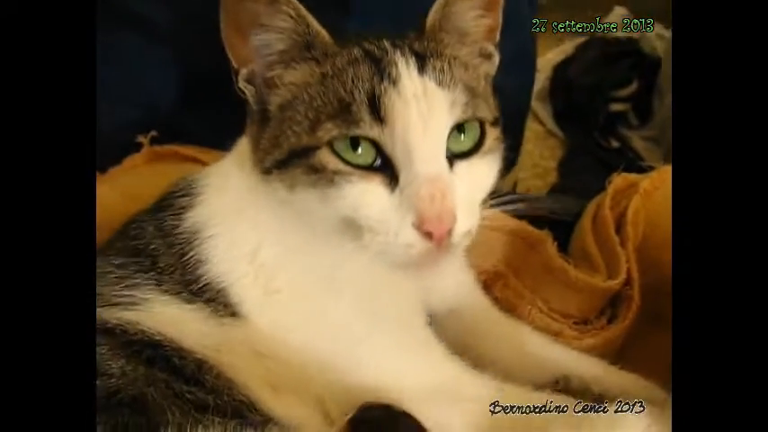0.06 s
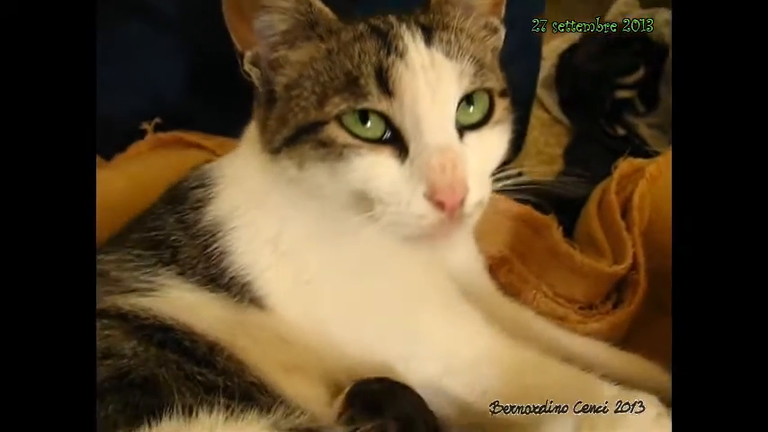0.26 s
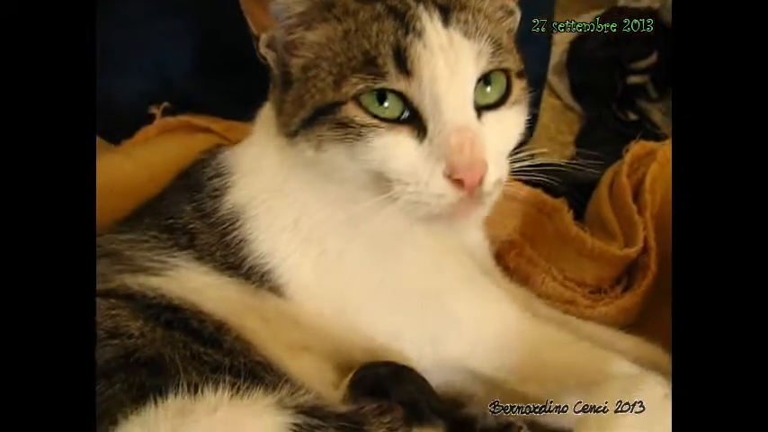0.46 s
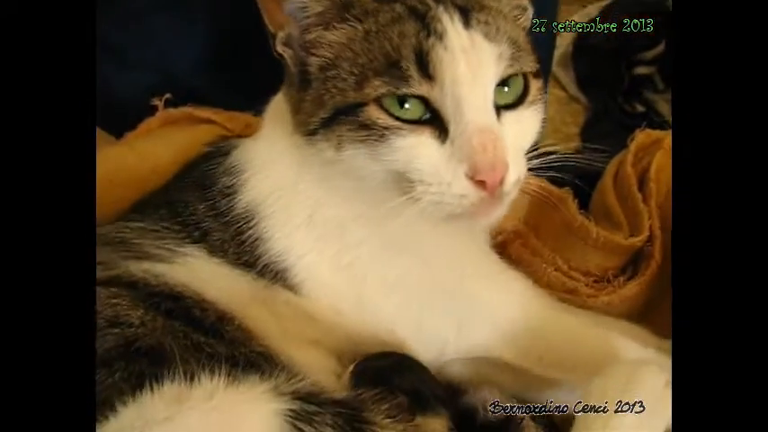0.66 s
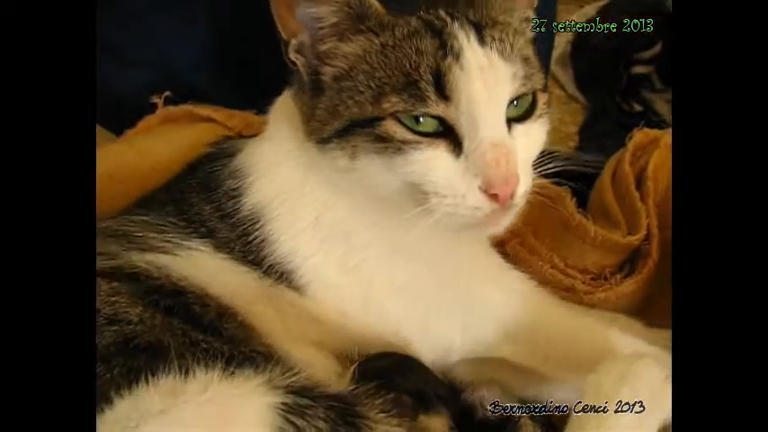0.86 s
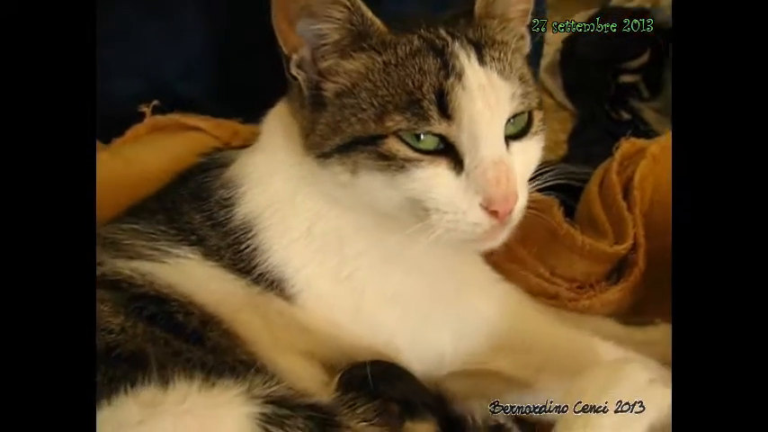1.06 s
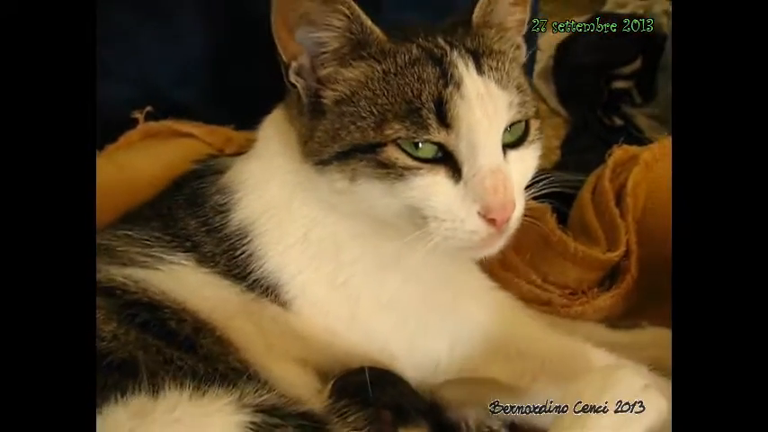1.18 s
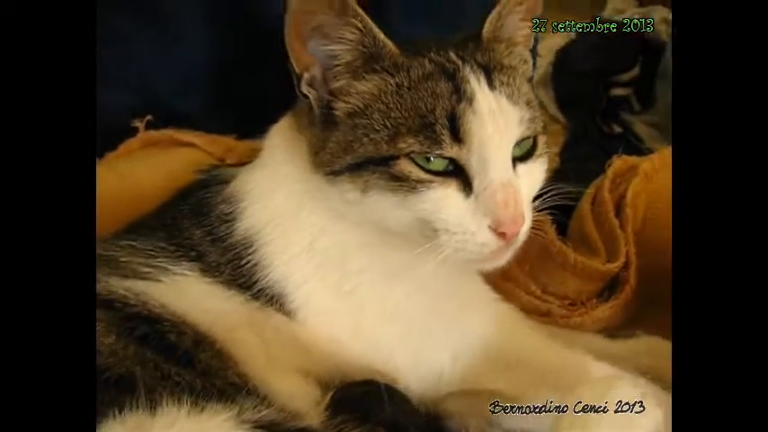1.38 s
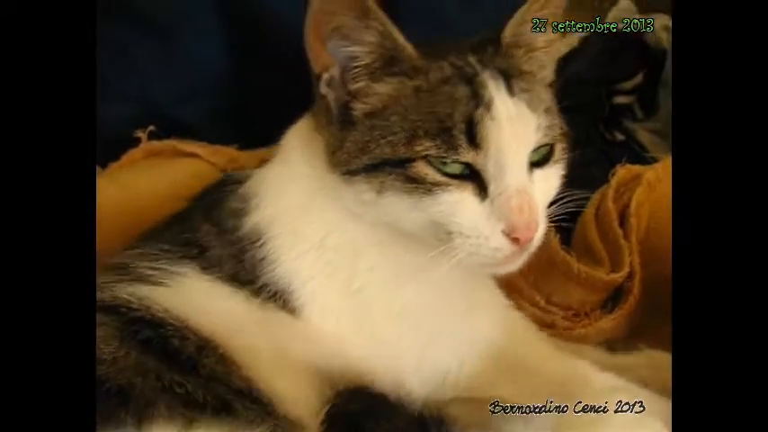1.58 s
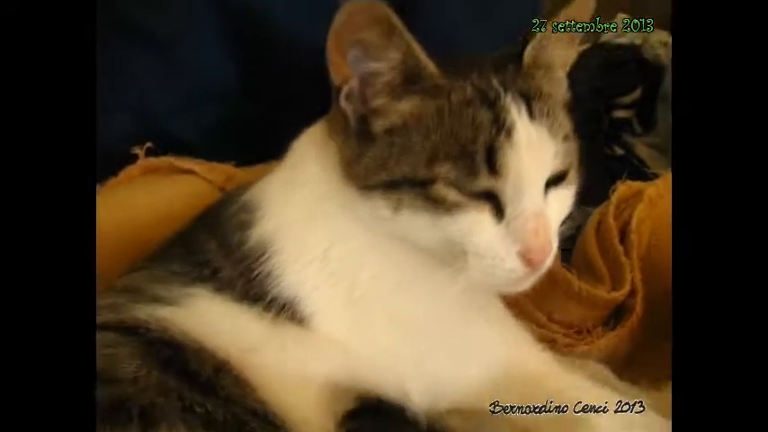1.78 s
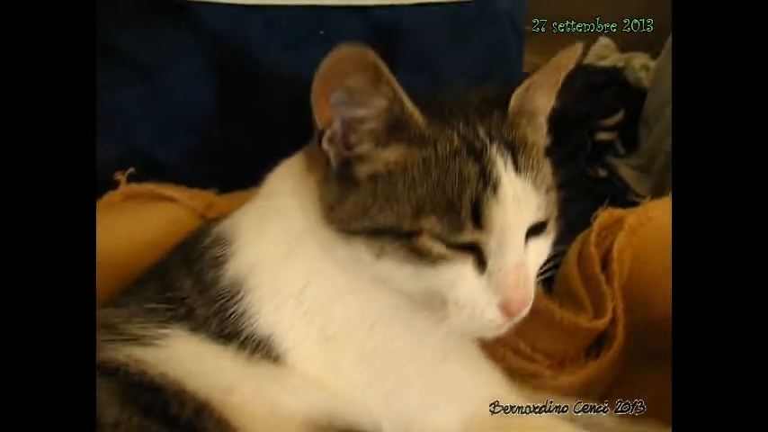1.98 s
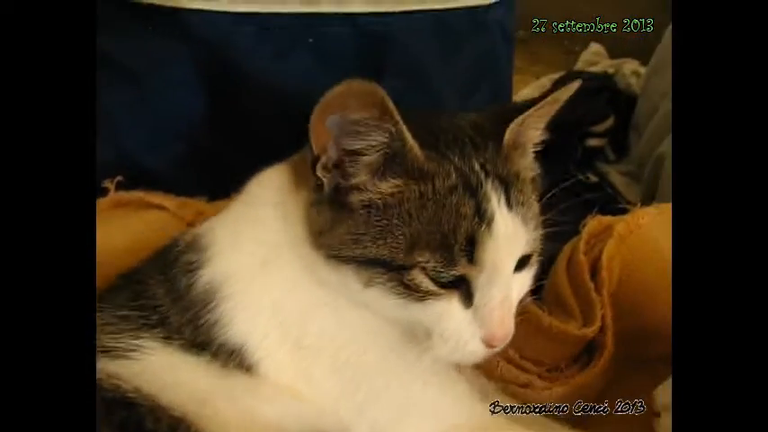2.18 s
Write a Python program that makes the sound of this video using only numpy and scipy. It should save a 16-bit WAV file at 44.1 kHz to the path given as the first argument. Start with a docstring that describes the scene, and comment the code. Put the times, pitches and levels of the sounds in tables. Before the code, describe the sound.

A cat trills twice close to the microphone in a small quiet room. The first trill warbles clearly and sinks into a rattle; the second rattles throughout. Soft purring surrounds them over a faint hiss.

```python
"""Cat trilling and purring

A cat close to a camera in a small quiet room gives two closed-mouth trills and purrs softly around them.
The first starts as a clear warbling note and sinks into a rattle; the second rattles throughout.
The purr flutter of the larynx modulates the voice; each snap of the vocal folds excites the resonances
of the throat and sends a rasp through the nose. Fur brushes cloth; the camera hisses and whines."""
import sys
import numpy as np
from scipy import signal
from scipy.fft import rfft, irfft
from scipy.io import wavfile
from scipy.ndimage import uniform_filter1d

SR = 44100
rng = np.random.default_rng(int(sys.argv[2]) if len(sys.argv) > 2 else 0)


def inscribe(sig):
    """Save sig as 16-bit PCM at rate SR to the path in sys.argv[1].

    A 1-D sig is mono; a 2-D sig holds one channel per row.
    Samples are clipped to [-1, 1] before scaling.
    """
    pcm = np.round(np.clip(np.atleast_2d(sig).T, -1, 1) * 32767)
    wavfile.write(sys.argv[1], SR, pcm.astype(np.int16))


N = 99225

# Flutter rate of the larynx in the first trill: t/s, f/Hz
FIRST_FLUTTER = [(.24, 34.2), (.34, 34.2), (.37, 37.5), (.8, 37.5)]
# Resonances of the throat: f/Hz, gain/dB
THROAT = [(40, -28.5), (90, -18), (130, -6), (172, 1.5), (230, -1.5), (272, 3.5), (345, 5), (470, -4.5),
          (560, -11.5), (660, -26), (780, -14.5), (920, -10), (1080, -19.5), (1250, -16.5), (1500, -38.5),
          (2500, -44), (5000, -58), (12000, -85)]


def undb(db):
    """Amplitude ratio of a level in decibels."""
    return 10 ** (np.asarray(db) / 20)


def clock():
    """Uniform sampling: t/s of every sample."""
    return np.arange(N) / SR


def curve(table, column=1):
    """Linear interpolation of a table column over time."""
    rows = np.array(table)
    return np.interp(clock(), rows[:, 0], rows[:, column])


def during(table):
    """Rectangular gate, open from a table's first time to its last."""
    return (clock() >= table[0][0]) & (clock() <= table[-1][0])


def across(table, column=1):
    """Interpolation of a table column over log frequency."""
    rows = np.array(table)
    hz = np.arange(N + 1) * SR / (2 * N)
    return np.interp(np.log(hz + 1), np.log(rows[:, 0]), rows[:, column])


def shape(x, response):
    """Linear filtering: the spectrum is multiplied by a frequency response."""
    return irfft(rfft(x, 2 * N) * response)[..., :N]


def colour(x, table):
    """Minimum-phase filter through points f/Hz, gain/dB, made by folding the cepstrum."""
    cepstrum = irfft(np.log(undb(across(table))))
    cepstrum[1:N] *= 2
    cepstrum[N + 1:] = 0
    return shape(x, np.exp(rfft(cepstrum)))


def unit(x, where=slice(None)):
    """Normalisation to rms 1 over a stretch."""
    return x / np.sqrt(np.mean(x[where] ** 2) + 1e-18)


def impulses(times, sizes, half_width=8):
    """Band-limited impulses: a windowed sinc at each exact time."""
    out = np.zeros(N)
    at = np.asarray(times)[:, None] * SR
    taps = at.astype(int) + np.arange(1 - half_width, half_width + 1)
    pulses = np.asarray(sizes)[:, None] * np.sinc(taps - at) * np.sinc((taps - at) / half_width)
    np.add.at(out, np.clip(taps, 0, N - 1), pulses)
    return out


def blend(a, b, share):
    """Incoherent sounds add in power; a takes the given share."""
    return np.sqrt(share) * a + np.sqrt(1 - share) * b


def background():
    """Partly coherent room tone and hiss, with the camera's whine modulated in phase and amplitude."""
    # Spectrum of room tone and hiss: f/Hz, relative level/dB
    hiss_spectrum = [(25, -19), (70, -8.5), (110, -1), (165, 3.5), (250, -5), (350, 5), (480, -2),
                     (640, -5.5), (780, -1), (1100, -7), (1700, -9.5), (3000, -11), (6500, -13.5),
                     (8200, -8.5), (9500, -17.5), (15500, -23)]
    # Likeness of left and right: f/Hz, correlation
    correlation = [(60, 0.95), (130, 0.99), (290, 0.73), (640, 0.17), (1400, .33), (3100, 0.36),
                   (7000, 0.069), (15000, .12)]
    # Partials of the whine: f/Hz, relative level/dB
    partials = [(7852.3, 0), (8250.5, -8.5), (7084, -15)]
    t, sides = clock(), np.array([[1], [-1]])
    density, alike = undb(across(hiss_spectrum)), across(correlation)
    mid = shape(rng.standard_normal(N), density * np.sqrt(1 + alike))
    side = shape(rng.standard_normal(N), density * np.sqrt(1 - alike))
    hiss = unit(mid + sides * side) * undb(-40)
    wobble_hz, wobble_rad, left_lead_rad, balance_db = 29.8, 1.1, -1.9, -3
    wobble = 2 * np.pi * wobble_hz * t
    offset = wobble_rad * np.sin(wobble) + sides * left_lead_rad / 2
    whine = sum(undb(db - 45.5) * np.sin(2 * np.pi * hz * t + offset) for hz, db in partials)
    throb = 1 + .42 * np.cos(wobble)
    return hiss + np.sqrt(2) * whine * throb * undb(sides * balance_db / 2)


def room(x):
    """Direct sound and an exponentially decaying diffuse field add at two microphone ports."""
    # Left port relative to right: f/Hz, level/dB, phase lead/rad
    ports = [(198, -0.2, 0), (1290, 0.5, -0.3), (2400, -3.5, -1.1), (4140, -7, 1), (5200, 0.5, -1.8),
             (7500, -1, -1.4), (8570, -5.5, -1.76), (9300, -3.2, -1.06)]
    # Colour of the reverberation: f/Hz, gain/dB
    reverb_colour = [(100, 14), (380, -28), (900, 2.5), (3000, 8), (8000, 7), (14000, 13)]
    t60_s = .16
    left = undb(across(ports) / 2) * np.exp(.5j * across(ports, 2))
    tails = rng.standard_normal((2, N)) * undb(-60 * clock() / t60_s)
    tails /= np.sqrt(np.sum(tails ** 2, axis=1, keepdims=True))
    diffuse = signal.fftconvolve(colour(x, reverb_colour)[None], tails, axes=1)[:, :N]
    return shape(x, np.array([left, 1 / left])) + undb(-14.5) * diffuse


def rustles():
    """Friction of fur on cloth: bursts of band noise with exponential decay."""
    # Scuffs: t/s, starting level/dB, decay time/s, centre f/Hz
    scuffs = [(.1274, -30, 0.00066, 3760), (0.209, -34, 0.0023, 5260), (.9978, -34.5, 0.0011, 3380),
              (1.0492, -33, 0.0013, 2020), (1.0663, -41.5, 0.018, 1250), (1.1465, -37.5, 0.0032, 2130),
              (2.2317, -35, .011, 1630)]
    out = np.zeros(N)
    for at, db, decay, hz in scuffs:
        age = clock() - at
        band = [(hz / 4, -15), (hz, 0), (hz * 2, -6), (hz * 10, -30)]
        noise = unit(colour(rng.standard_normal(N), band))
        out += noise * undb(db) * (age > 0) * np.exp(-np.abs(age) / decay)
    return out


def purr():
    """Pulse excitation: the larynx thumps lightly on closing, harder on opening; the throat rings."""
    # Runs of purring: first beat t/s, last beat t/s, period/s, lead of the closing thump/s, level/dB
    runs = [(.0014, .1996, .0397, .0162, -27), (.8011, .9636, .0407, .0152, -26),
            (1.0762, 1.3352, .037, .0128, -30.5), (1.3768, 1.4188, .0418, .0148, -26.5),
            (2.0394, 2.1636, .0413, .0143, -24.5), (2.2008, 2.2009, .04, .014, -32.5)]
    thump_hz, closing_db, scatter_db = 370, -4.5, .8
    thumps = np.zeros(N)
    for first, last, period, lead, db in runs:
        for beat in range(round((last - first) / period) + 1):
            for before, part_db in ((0, 0), (lead, closing_db)):
                phase = 2 * np.pi * thump_hz * (clock() - first - beat * period + before)
                window = np.exp(-np.minimum(phase ** 2, 400) / (2 * np.pi))
                gain = undb(db + part_db + scatter_db * rng.standard_normal())
                thumps -= np.sqrt(2) * np.sin(phase) * window * gain
    return thumps + undb(-10) * colour(thumps, THROAT)


def beats(flutter):
    """Phase is the integral of frequency: flutter beats since the trill began."""
    return np.cumsum(curve(flutter) * (clock() >= flutter[0][0])) / SR


def fold_snaps(voice, flutter):
    """Gated oscillation: each flutter beat restarts a short, jittered train of vocal fold snaps."""
    t, beat, hz = clock(), beats(flutter), curve(voice)
    delay_s, period_scatter, jitter = .0031, .04, .06
    beat_count = int(np.interp(voice[-1][0], t, beat)) + 1
    edges = np.interp(np.arange(beat_count + 1) + 1e-9, beat, t)
    snaps = []
    for start, end in zip(edges, edges[1:]):
        at = start + delay_s
        stretch = 1 + period_scatter * rng.standard_normal()
        for late, loud, airy in rng.standard_normal((12, 3)):  # scatter of timing, push and rasp
            period = stretch / np.interp(at, t, hz)
            if at < end:
                place = (at - start) / (end - start)  # 0 to 1 within the beat
                snaps.append((at + jitter * period * late, place, loud, airy))
            at += period
    return np.array(snaps).T


def rattle(voice, flutter):
    """Source and filter in creaky voice: snaps of the folds excite throat, chest and nose."""
    # Resonances of the nose: f/Hz, gain/dB
    nose = [(400, -25), (1000, -7), (1500, -12.5), (2300, -11), (2950, -1), (3600, -16.5), (4500, -13.5),
            (5200, -7), (5800, 3), (6700, -8.5), (7300, -7), (8100, -1), (9000, -8.5), (10200, -21.5),
            (12000, -33), (16000, -34)]
    # Resonance of the chest: f/Hz, gain/dB
    chest_response = [(30, -27), (80, -22.5), (120, -3.5), (156, 9), (200, -24), (300, -13), (1000, -47),
                      (6000, -80)]
    t, on, hz = clock(), during(voice), curve(voice)
    times, place, loud, airy = fold_snaps(voice, flutter)
    push_delay_s, shimmer_db, chop_db = .0009, 2.67, 2
    push_db = shimmer_db * loud - chop_db * np.cos(2 * np.pi * place)
    push = impulses(times + push_delay_s, undb(push_db))
    scatter_db, rasp_chop_db, lead_beats = 1.6, 7, .075
    click_db = scatter_db * airy - rasp_chop_db * np.cos(2 * np.pi * (place + lead_beats))
    clicks = impulses(times, undb(click_db))
    puff_s, leak = .00045, .24
    puffs = unit(signal.fftconvolve(clicks, t * np.exp(-t / puff_s))[:N], on)
    air = (puffs + leak) * rng.standard_normal(N)
    rasp = unit(colour(blend(unit(clicks, on), unit(air, on), share=.2), nose), on)
    chest_db = -3.5 - 1.3 * (hz - 160.6)  # the chest joins in when the pitch is low
    chest = unit(colour(push, chest_response), on) * undb(chest_db)
    throat = unit(colour(push, THROAT), on)
    body = unit(throat + chest, on)
    return on * (body * undb(curve(voice, 2)) + rasp * undb(curve(voice, 3)))


def clear_note():
    """Frequency and amplitude modulation: the flutter bends the voice's pitch and at last chops it up."""
    # Voice: t/s, pitch f/Hz, fundamental level/dB, overtone level/dB, rasp level/dB, chop depth/dB
    voice = [(.2345, 384, -48, -54, -54, .4), (.2375, 381, -24, -34, -33, .4),
             (.276, 371, -21.2, -32.5, -32.5, .4), (.336, 390, -21.6, -29.5, -32.5, .4),
             (.376, 380, -21.4, -30.5, -32.2, .4), (.421, 379, -19.4, -31.5, -31.5, .4),
             (.505, 378, -19, -31, -31.5, .7), (.535, 368, -22, -33, -33, 1.2),
             (.56, 352, -24, -36, -35, 4), (.612, 320, -27, -44, -41, 5), (.628, 305, -48, -58, -58, 5)]
    # Spectral envelope of the overtones: f/Hz, gain/dB
    formants = [(400, -25.5), (600, -17.5), (790, 0), (1000, 4.5), (1190, -13), (1600, -10), (2000, -6.5),
                (2400, -9), (2850, -4.5), (3400, -26), (4500, -41), (9000, -85)]
    # Resonances of the nose in the clear note: f/Hz, gain/dB
    nose = [(400, -25), (950, 0), (1400, -9), (2850, -3.5), (3700, -14), (4500, -15.5), (5600, -1),
            (6700, -12), (8050, 2), (9000, -10), (10200, -19), (12000, -30), (16000, -49)]
    warble_hz, limp, jitter, puff_cycles = 25, .35, .014, .28
    overtone_swing_db, rasp_swing_db = 3, 1.16
    beat = beats(FIRST_FLUTTER)
    swing = -np.cos(2 * np.pi * beat) * (1 - limp * np.cos(np.pi * beat))  # alternate beats go deeper
    wander = unit(uniform_filter1d(rng.standard_normal(N), size=200))
    hz = (curve(voice) + warble_hz * swing) * (1 + jitter * wander)
    cycles = np.cumsum(hz) / SR
    snap_times = np.interp(np.arange(1, int(cycles[-1])), cycles, clock())
    clicks = impulses(snap_times, np.ones(len(snap_times)))
    tone = unit(np.sin(2 * np.pi * cycles)) * undb(curve(voice, 2) + curve(voice, 5) * swing)
    overtones = unit(colour(clicks, formants)) * undb(curve(voice, 3) + overtone_swing_db * swing)
    air = np.exp(-(cycles % 1) / puff_cycles) * rng.standard_normal(N)
    rasp = unit(colour(blend(unit(clicks), unit(air), share=.35), nose))
    rasp *= undb(curve(voice, 4) + rasp_swing_db * swing)
    return during(voice) * (tone + overtones + rasp)


def scene():
    """Superposition of the cat's sounds in the room and the steady background."""
    # Creaky voice in each trill: t/s, pitch f/Hz, throat and chest level/dB, rasp level/dB
    first_creak = [(.542, 240, -31, -47), (.572, 235.3, -29, -33), (.611, 232.7, -26, -33.5),
                   (.646, 221.6, -26, -30.5), (.721, 201.7, -26, -30), (.751, 189.6, -29.5, -33.5),
                   (.769, 166.3, -34.5, -40), (.795, 159.5, -40, -65)]
    second_creak = [(1.426, 169.4, -63, -68), (1.434, 170.4, -25, -34), (1.471, 162, -32, -35.5),
                    (1.521, 158, -33.5, -35), (1.581, 162.5, -25.5, -35), (1.641, 164.1, -29, -33),
                    (1.686, 174, -22.5, -32), (1.751, 213.8, -25, -33.5), (1.831, 222.7, -24.5, -34.5),
                    (1.931, 200.2, -26, -34), (1.96, 198.7, -25.5, -35), (1.982, 204.2, -23, -31),
                    (1.995, 195, -28, -29), (2.003, 181, -33.5, -53), (2.03, 161.4, -45, -76)]
    # Flutter rate of the larynx in the second trill: t/s, f/Hz
    second_flutter = [(1.414, 38.6), (1.84, 38.9), (1.87, 36.4), (2.02, 36.4)]
    first_trill = clear_note() + rattle(first_creak, FIRST_FLUTTER)
    second_trill = rattle(second_creak, second_flutter)
    return room(first_trill + second_trill + purr() + rustles()) + background()


def record(dry):
    """Band limiting: the camera's steep low-pass filter cuts the top of the treble."""
    cutoff_hz = 15750
    return signal.sosfilt(signal.ellip(10, .2, 70, cutoff_hz, fs=SR, output="sos"), dry)


dry = scene()
out = record(dry)
inscribe(out)
```